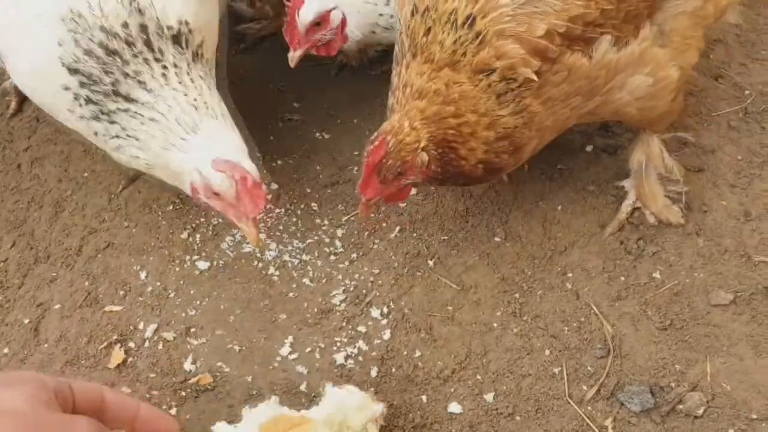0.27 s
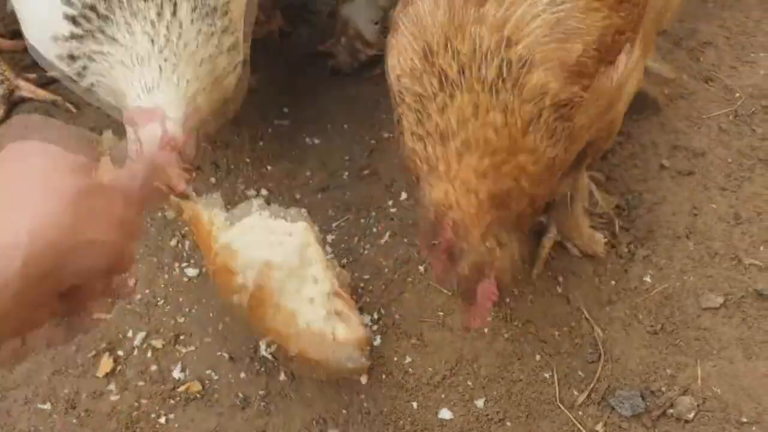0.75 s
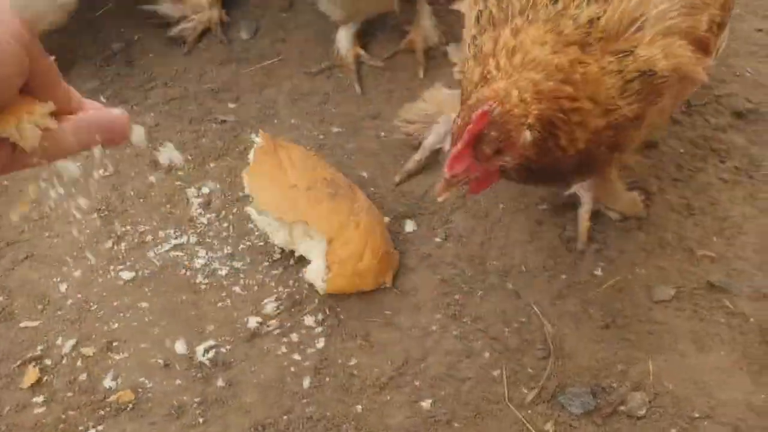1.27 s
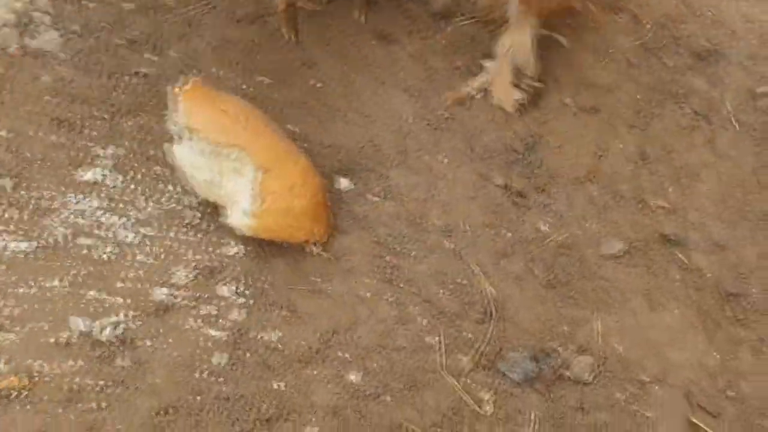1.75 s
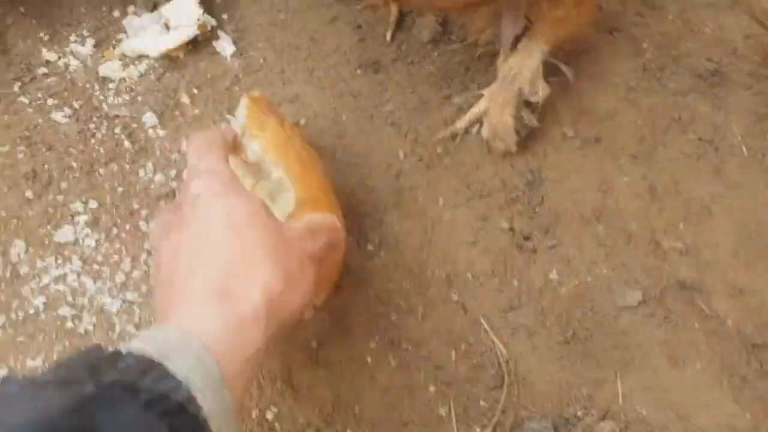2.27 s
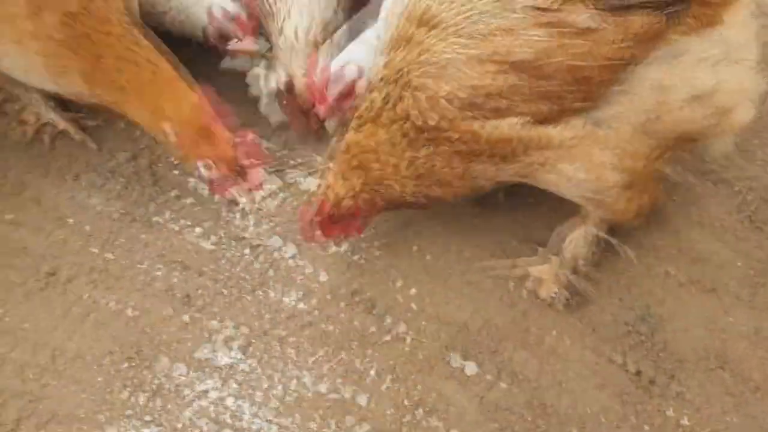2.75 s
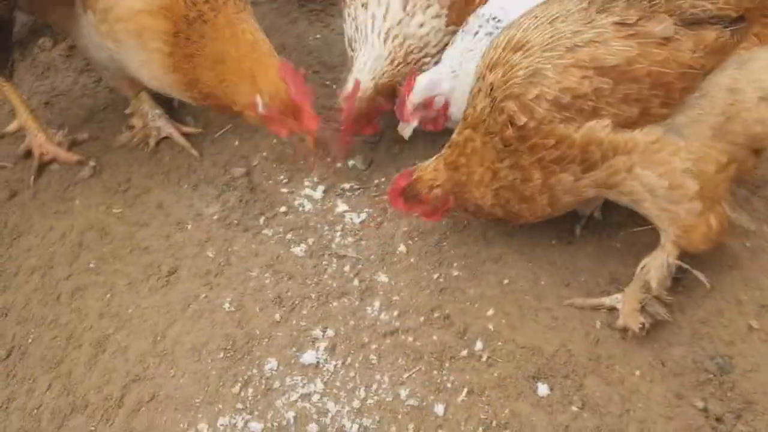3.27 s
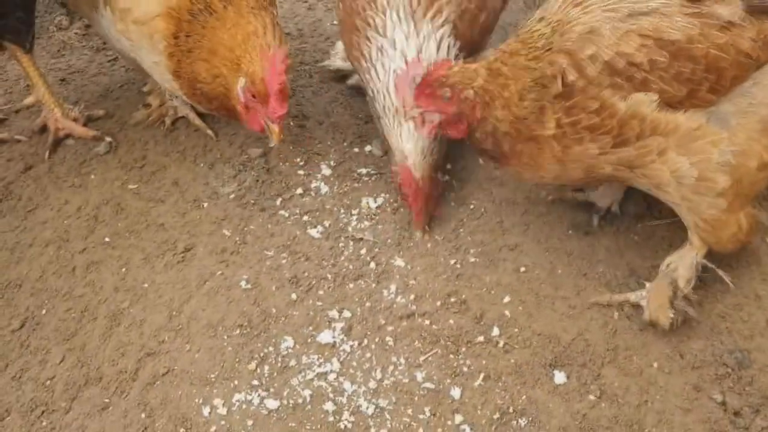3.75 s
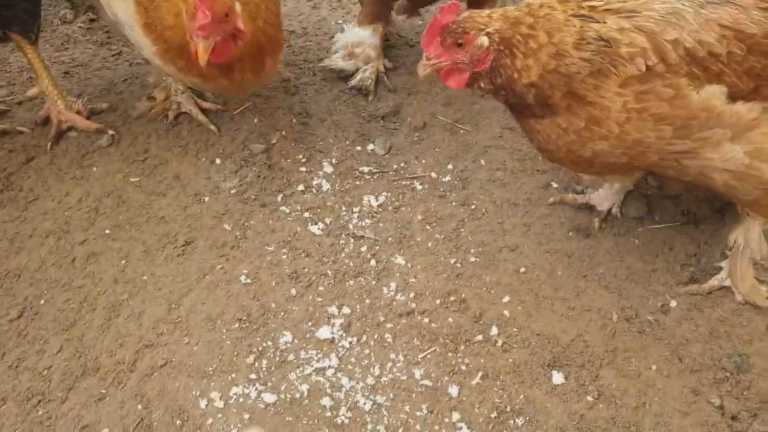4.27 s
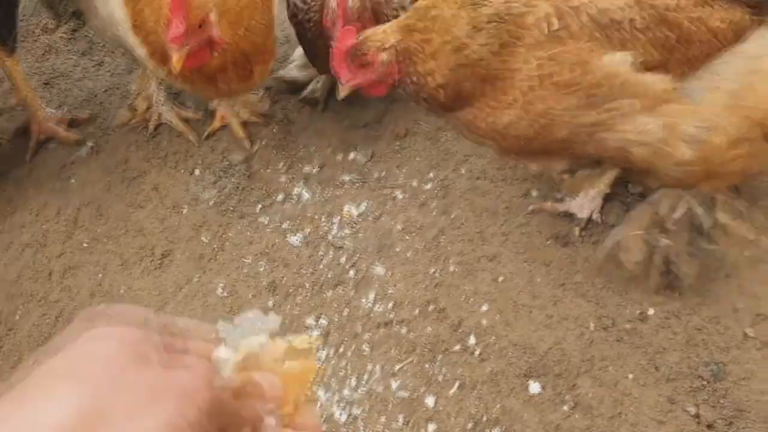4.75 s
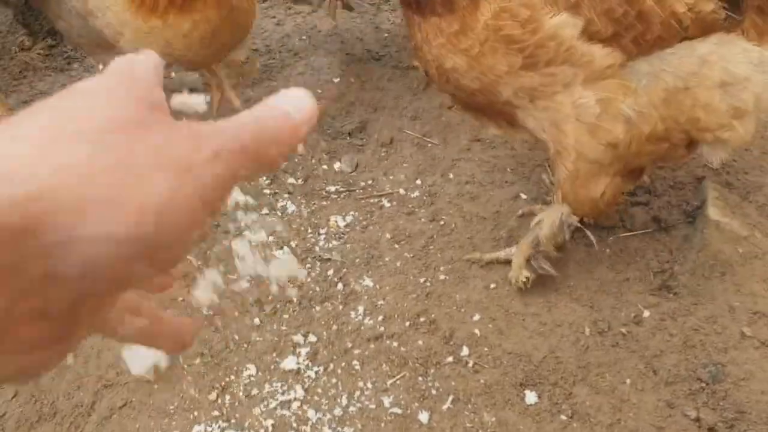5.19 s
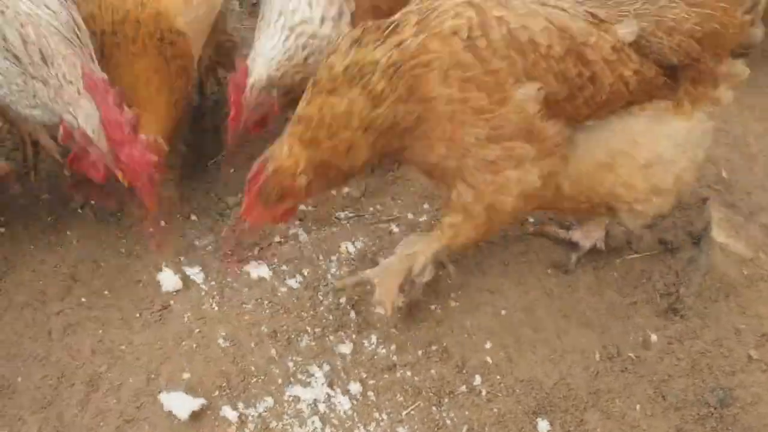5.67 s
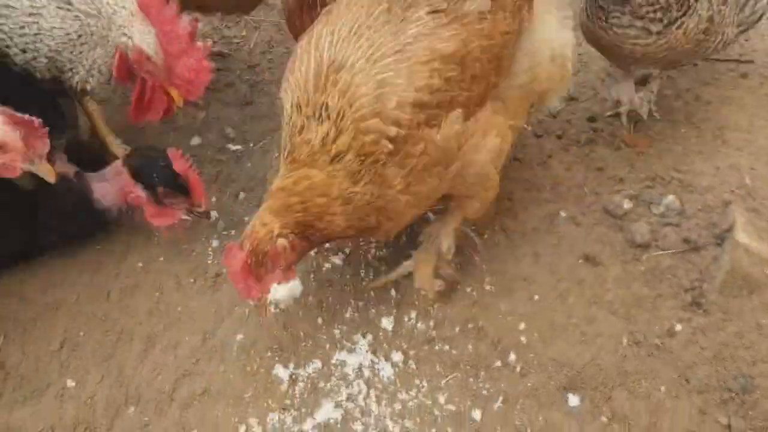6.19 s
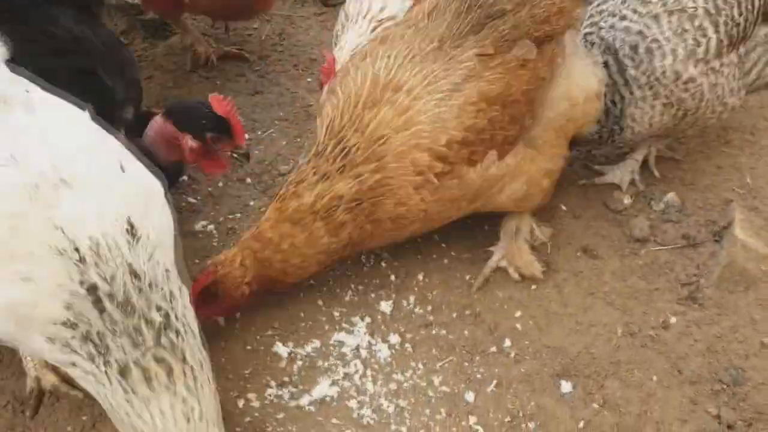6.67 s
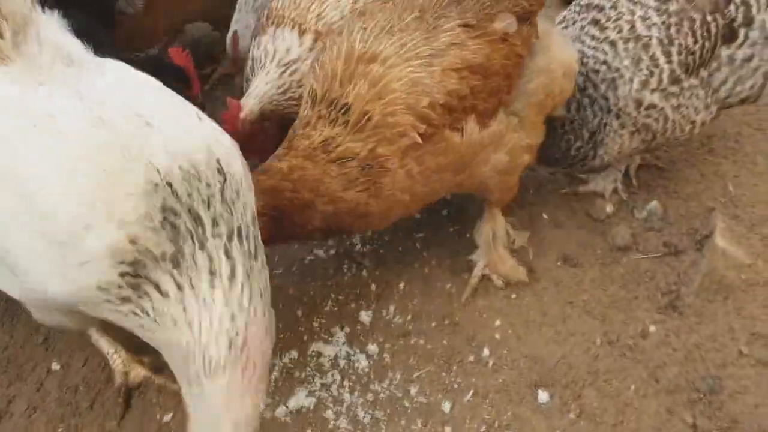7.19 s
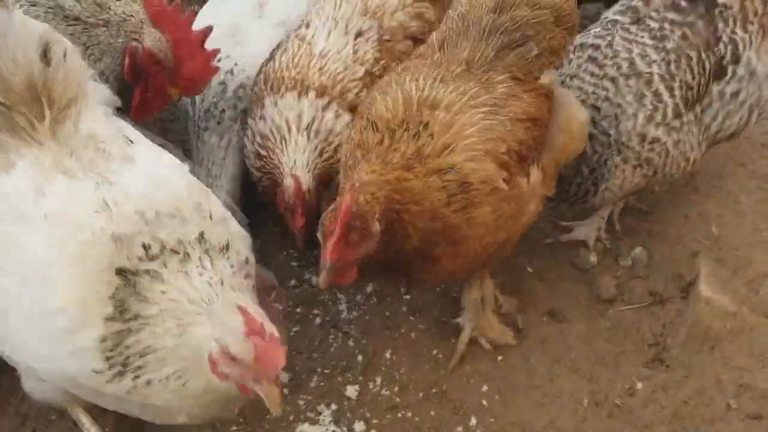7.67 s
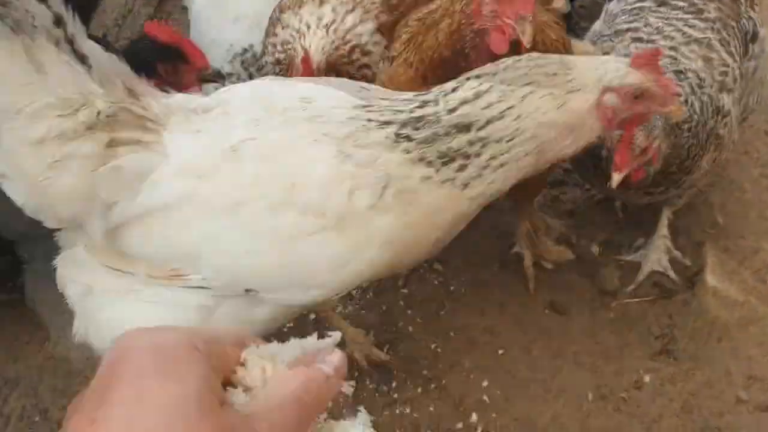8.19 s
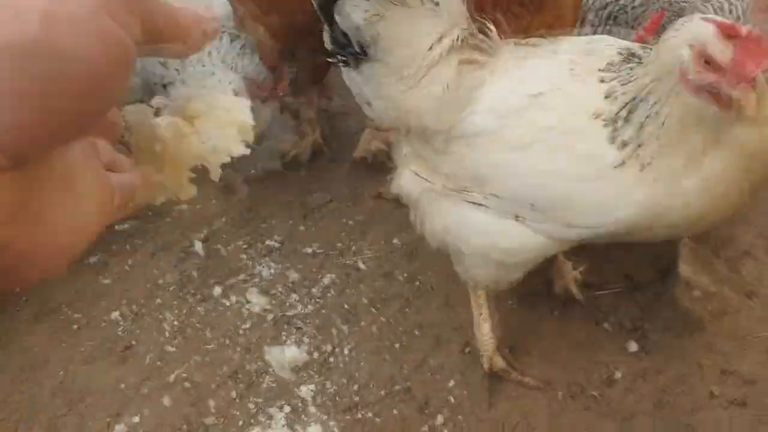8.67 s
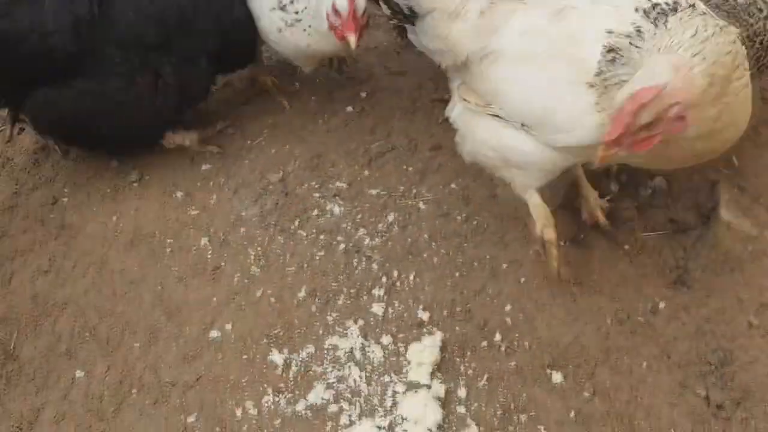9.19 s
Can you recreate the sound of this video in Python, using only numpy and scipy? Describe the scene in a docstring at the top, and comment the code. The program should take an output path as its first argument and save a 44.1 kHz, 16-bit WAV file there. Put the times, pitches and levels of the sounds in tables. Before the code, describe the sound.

Hens feed close by in an outdoor dirt yard with very little echo. For the first 1.5 seconds there are soft clucks, small trills and thin whines, with light beak taps on grit; the sharpest tap lands at 1.6. Louder, higher clucks cluster from 1.9 to 3 seconds. Low, quiet clucks and short trills follow until 4.2, then a brief lull. From 5 to 6.7 seconds comes a busy run of hoarse, fluttering trills and clucks, with one soft low boom at 5.9 and pecks between 6.3 and 6.9. After another lull, a breathy squawk breaks out at 7.8, followed by a peck, trills around 8.2 and 8.6, and last clucks near 9. Throughout, a faint hiss swells and sinks with rustling, crackle, occasional foot scuffs and a low rumble. A distant small bird peeps very faintly at 1.7 and 3.2.

```python
"""In a bare dirt yard, hens feed on bread crumbs close by. They cluck, trill and whine:
the syrinx is the source, and the throat, windpipe and beak filter it. Beaks tick on grit,
feet scuff and one squawk hisses, all as shaped noise. Behind them are a hiss that swells
and sinks with faint rustling and crackle, two faint peeps of a small bird, one soft boom
and a low outdoor rumble. The yard gives a short, weak echo."""
import sys
import numpy as np
from scipy import signal
from scipy.fft import rfft, irfft
from scipy.io import wavfile

SR = 44100
rng = np.random.default_rng(int(sys.argv[2]) if len(sys.argv) > 2 else 0)


def store_wav(level_fs):
    """Save 16-bit WAV to argv[1]."""
    pcm = np.round(np.clip(np.atleast_2d(level_fs), -1, 1) * 32767)
    wavfile.write(sys.argv[1], SR, pcm.T.astype(np.int16))


N = 416304
TIME = np.arange(N) / SR
BAND_LIMIT_HZ = 15950

LEAD_SHARE = .35  # a faint croak leads into a cluck, this share of its attack long
THROAT_OCTAVES_PER_DB, SHUT_DB = 0.285, -8  # the throat resonance sinks with effort, down to SHUT_DB
BEAK_CUT_SHARE = 0.65  # the beak radiates little below this share of the open throat resonance
GAPE_HZ, GAPE_DB_PER_OCTAVE = 1435, 19.5  # throat resonance with the beak wide open; rasp gained
WINDPIPE_HZ, WINDPIPE_WIDTH_HZ, WINDPIPE_DB = 695, 61, -15.5
# Upper throat resonances of a cluck. Each row: frequency in Hz, nominal width in Hz, gain in dB.
RASP_FORMANTS = [(2150,85,10.5),(3500,180,0.5),(4250,280,-2.5),(4740,500,-9),(6250,420,-7.5),(11310,5700,-28)]
# Clucks and, when held long, growls. Each row: start, attack and hold in seconds, peak effort in dB,
# open throat resonance in Hz, pitch in Hz, bend in octaves, roughness from 0 to 1, chest in dB,
# rasp in dB, place.
CLUCK_CALLS = [(0.133,0.022,0.053,-46.5,670,277.5,-0.41,0.37,-1,-45,"middle"),
               (0.752,0.0053,0.042,-45,710,275.3,-0.26,0.06,-4,-35,"middle"),
               (0.888,0.0084,0.014,-37.5,720,292.4,-0.21,0,1.5,-32,"middle"),
               (1.032,0.016,0.028,-43,710,268,-0.095,0.13,-33,-40,"middle"),
               (1.426,0.0025,0.026,-31,945,336.7,-0.082,0.61,-9,-24,"front"),
               (1.857,0.0081,0.054,-38,1120,335.5,0.0017,0.51,-15,-21,"front"),
               (1.888,0.0063,0.013,-22,1280,310,-0.057,0.26,-16,-12,"front"),
               (2.06,0.018,0.0054,-30,1530,339.7,-0.041,0.25,-5,-19,"front"),
               (2.262,0.01,0.018,-18,1470,690,-0.035,0.21,-12,-2,"left"),
               (2.371,0.0031,0.0042,-18,1570,739,0,0.11,-38,-4,"left"),
               (2.379,0.0061,0.026,-23.5,1560,676,-0.15,0.32,-11,-4,"left"),
               (2.578,0.012,0.024,-18.5,1320,324.9,-0.1,0.33,-14.5,-5.5,"middle"),
               (2.767,0.0035,0.027,-27.5,686,359,0.13,0.3,-13,-23,"middle"),
               (2.899,0.01,0.0092,-20,1050,324,-0.1,0.22,-10,-9.5,"middle"),
               (3.321,0.019,0.091,-53,695,238,-0.12,0.32,1,-19,"front"),
               (3.407,0.019,0.075,-38.5,644,203.2,-0.35,0.27,0,-41,"front"),
               (3.509,0.012,0.092,-43.5,600,251,0.24,0.2,0.5,-29,"front"),
               (3.69,0.0066,0.019,-31,1250,742,0.073,0.24,-37,-38,"right"),
               (3.991,0.0048,0.042,-37.5,1050,304.2,-0.091,0.39,-25,-27,"right"),
               (4.181,0.01,0.019,-30,816,281,-0.23,0.3,-14,-30,"right"),
               (4.981,0.0057,0.044,-48.5,910,687,-0.027,0.2,2,-28,"left"),
               (5.051,0.021,0.039,-37.5,1270,600,-0.12,0.5,-15,-7,"left"),
               (5.34,0.0044,0.023,-41.5,1270,695,-0.058,0.42,-16,-16,"left"),
               (5.552,0.011,0.0065,-24,1360,324,-0.21,0.42,-18.5,-0.5,"left"),
               (6.188,0.032,0.004,-37,830,189.6,0.17,0.48,4,-14,"centre"),
               (6.53,0.021,0.019,-32,1040,238.2,0.15,0.38,-25,-17.5,"centre"),
               (8.683,0.0085,0.0089,-39,850,604,-0.019,0.34,-9,-29,"middle"),
               (8.811,0.022,0.0092,-29,1084,651,-0.053,0.22,-43,-29,"right"),
               (9.003,0.028,0.009,-24,1300,627,0.05,0.33,-13,-16,"middle")]
def cluck(attack, hold, peak_db, open_hz, pitch, bend, rough, chest_db, rasp_db):
    """Source and filter: uneven syrinx pulses and puffs of breath excite the throat's resonances."""
    t, effort_db = gesture(attack, hold, LEAD_SHARE * attack)
    size = len(t)
    jitter = np.exp(.02 * wander(size, 25) + .26 * rough * wander(size, 400))
    hz = contour(np.linspace(0, 1, size), pitch, bend) * jitter
    cycles = np.cumsum(hz) / SR
    harmonics = np.arange(1, int(BAND_LIMIT_HZ / pitch))
    shimmer = np.exp(1.16 * rough * wander(size, 480))
    alternation = 1 + 0.8 * rough * np.cos(np.pi * cycles)  # strong and weak pulses take turns
    pulses = np.cos(2 * np.pi * harmonics[:, None] * cycles).sum(0) * shimmer * alternation
    puffs = (.5 + np.exp(-(cycles % 1) / 0.32)) * rng.standard_normal(size)
    drive = (1 - rough) * evened(pulses) + rough * evened(puffs)
    # an open beak raises and widens the throat resonance and lifts the upper ones a little
    throat_hz = open_hz * 2 ** (THROAT_OCTAVES_PER_DB * np.maximum(effort_db, SHUT_DB))
    width = throat_hz.mean()
    lift = (throat_hz / 1250) ** .03 * (1 + .03 * wander(size, 150))
    radiated = signal.lfilter(*signal.butter(1, BEAK_CUT_SHARE * open_hz, "high", fs=SR), drive)
    throat = evened(resonate(formant(radiated, throat_hz, width), throat_hz, 3 * width))
    lowest, *upper = [gain_of(db) * formant(drive, f * lift, 2 * w) for f, w, db in RASP_FORMANTS]
    # the lowest rasp resonance speaks only through a wide-open beak
    gape = gain_of(GAPE_DB_PER_OCTAVE * np.log2(open_hz / GAPE_HZ))
    rasp = evened(gape * lowest + sum(upper))
    # the body radiates the lowest partials; the windpipe rings at one pitch whatever the beak does
    chest = evened(formant(drive, min(1.49 * pitch, 440), width=240))
    windpipe = evened(formant(drive, WINDPIPE_HZ, WINDPIPE_WIDTH_HZ))
    sag_db = 0.19 * effort_db  # chest and rasp fade faster than the rest
    body = evened(throat + gain_of(chest_db + sag_db) * chest + gain_of(WINDPIPE_DB) * windpipe)
    voice = body + gain_of(rasp_db + sag_db) * rasp
    return gain_of(peak_db + effort_db) * evened(voice)


FLUTTER_HZ = 54.41  # mean flutter rate of every trill
BEAK_RING_HZ, BEAK_RING_WIDTH_HZ = 1368, 1100
# Turbulence in a trill. Each row: frequency in Hz, gain in dB.
HOARSE_SPECTRUM = [(100,-38),(250,-12.5),(400,-14.5),(700,-21),(1500,-11),(3000,-48),(9000,-49)]
# Upper throat resonances of a trill. Each row: frequency in Hz, nominal width in Hz, gain in dB.
EDGE_FORMANTS = [(2840,230,-0.5),(3440,400,-2),(4233,300,-12),(6380,300,-4),(7030,260,-6.5)]
# Trills and short scooping whistles. Each row: start, attack and hold in seconds, peak effort in dB,
# mid pitch in Hz, bend and arch in octaves, swing as a share of the pitch, then overtones,
# hoarseness and ringing edge in dB, place.
TRILL_CALLS = [(0.742,0.0035,0.032,-39,595.6,0.014,-0.62,0.041,-31,-23,-38,"middle"),
               (0.865,0.013,0.044,-37,747,-0.068,-0.47,0.039,-45,-28,-46,"middle"),
               (1.02,0.0038,0.019,-44.5,640,-0.56,-0.066,0.02,-37,-32,-44,"middle"),
               (2.341,0.019,0.0083,-24,1534,0.28,-0.042,0.1,-29,-10,-25,"left"),
               (2.872,0.0021,0.024,-40,1440,1,0.6,0.031,-21,2.5,-27,"middle"),
               (3.68,0.0083,0.012,-31,1245,-0.15,0.055,.02,-22,-25,-30,"right"),
               (3.726,0.036,0.1,-37.5,1073,-0.27,0.13,0.11,-17.5,-0.5,-25,"right"),
               (3.953,0.024,0.0071,-28.5,608.5,0.06,-0.014,0.013,-8,-15,-17,"right"),
               (5.048,0.03,0.15,-38,553.5,-0.42,-0.13,0.11,-7.5,-3,-26.5,"left"),
               (5.567,0.0047,0.018,-22,1269,-0.52,-0.14,0.073,-15,-43,-14,"left"),
               (5.61,0.024,0.067,-27.5,1254,0.16,0.14,0.12,-23.5,-11,-31,"left"),
               (5.694,0.006,0.096,-34.5,1160,-0.92,0.15,0.2,-15,-5.5,-28,"left"),
               (5.833,0.012,0.022,-34,854,-0.12,-0.0055,0.37,-16.5,-9,-31,"front"),
               (6.122,0.003,0.023,-32.5,1038,-0.43,0.45,0.048,-13.5,-3,-17,"centre"),
               (6.213,0.036,0.066,-30,1056,-0.063,0.38,0.22,-24,-10.5,-22.5,"centre"),
               (6.546,0.018,0.031,-29,1023,0.14,0.044,0.23,-22,-7,-24,"centre"),
               (6.6,0.026,0.051,-26.5,1033,-0.5,0.25,0.2,-31,-12.5,-31,"centre"),
               (7.813,0.0018,0.022,-31,631,1.3,0.034,0.018,-9,-8.5,-19,"left"),
               (7.837,0.012,0.0099,-21,1120,0.11,0.25,0.017,-16.5,-13,-19,"left"),
               (7.857,0.0043,0.1,-28.5,547.8,-0.25,0.32,0.16,-3,-10,-29,"left"),
               (8.222,0.025,0.031,-32,1017,-0.061,0.59,0.17,-37,-6.5,-35,"middle"),
               (8.571,0.011,0.019,-28,675,0.55,0.2,0.038,-3.5,-10.5,-19.5,"middle"),
               (8.593,0.0094,0.074,-22.5,1189,-0.17,0.028,0.08,-25.5,-28,-42,"middle")]
def trill(attack, hold, peak_db, mid_hz, bend, arch, swing, overtone_db, hoarse_db, edge_db):
    """Modulation: a flutter swings a whistle's pitch and loudness, over a subharmonic rattle."""
    t, effort_db = gesture(attack, hold)
    size = len(t)
    beat = 2 * np.pi * np.cumsum(FLUTTER_HZ * (1 + .08 * wander(size, 50))) / SR
    flutter = np.sin(beat) * (1 + .3 * wander(size, 70))
    hz = contour(t, mid_hz, bend, arch) * (1 + swing * flutter)
    phase = 2 * np.pi * np.cumsum(hz * (1 + 0.035 * wander(size, 380))) / SR
    # the whistle rings out as it swings through the resonance of the open beak
    ring = evened(1 / np.hypot(1, 2 * (hz - BEAK_RING_HZ) / BEAK_RING_WIDTH_HZ))
    overtones = np.sin(2 * phase) + .35 * np.sin(3 * phase)
    tone = evened(np.sin(phase) + gain_of(overtone_db) * overtones)
    # the syrinx slaps shut unevenly on every second cycle; slaps and breath ring the throat
    harmonics = np.arange(1, int(BAND_LIMIT_HZ / mid_hz))
    slaps = np.cos(harmonics[:, None] * phase / 2).sum(0) * np.exp(.5 * wander(size, 300))
    rattle = evened(slaps) + .5 * rng.standard_normal(size)
    hoarse = evened(coloured(rattle, HOARSE_SPECTRUM))
    edge = evened(sum(gain_of(db) * formant(rattle, f, 2 * w) for f, w, db in EDGE_FORMANTS))
    # a wide swing is loudest on its way down, and the edge throbs most
    depth_db = 14 * swing - 0.5
    throb = gain_of(-depth_db * np.cos(beat) + 2.8 * wander(size, 160))
    voice = (ring * tone + gain_of(edge_db) * edge * throb) * throb + gain_of(hoarse_db) * hoarse
    return gain_of(peak_db + effort_db) * evened(voice)


# Soft whines of one hen. Each row: start, attack and hold in seconds, level in dB, pitch in Hz,
# bend in octaves.
WHINE_CALLS = [(0.681,0.023,0.15,-54,559,-0.014), (0.855,0.058,0.039,-48.5,547,0.043),
               (1.061,0.034,0.5,-49,553,0.0019), (1.416,0.011,0.086,-39.5,628,0.16),
               (1.589,0.022,0.013,-45,587,0.091), (3.597,0.0089,0.088,-47.5,551,0.12)]
def whine(attack, hold, db, mid_hz, bend, octave_db=-18):
    """Nearly periodic vibration behind a closed beak: a thin fundamental with a weak octave."""
    t, effort_db = gesture(attack, hold)
    waver = .022 * wander(len(t), 35) + .03 * wander(len(t), 250)
    phase = 2 * np.pi * np.cumsum(contour(t, mid_hz, bend) * (1 + waver)) / SR
    tone = evened(np.sin(phase) + gain_of(octave_db) * np.sin(2 * phase))
    return tone * gain_of(db + effort_db + 3 * wander(len(t), 30))


ONSET_DB, DROOP_DB, RELEASE_DB, FADE_DB = 13, 1.5, 13.5, 13.5  # the rise, then three successive falls
RELEASE_S, FADE_S = .012, .02
def gesture(attack, hold, lead=0):
    """A call's envelope: progress (0 at the start, 1 at release) and effort in dB from the peak."""
    knees = np.cumsum([0, attack, hold, RELEASE_S, FADE_S])
    t = np.arange(-lead, knees[-1], 1 / SR)
    under_db = [ONSET_DB + FADE_DB, ONSET_DB, 0, *np.cumsum([DROOP_DB, RELEASE_DB, FADE_DB])]
    return np.clip(t / knees[2], 0, 1), -np.interp(t, [-lead - 1 / SR, *knees], under_db)


def contour(progress, mid_hz, bend, arch=0):
    """A glide in log frequency: a slope of bend octaves plus a parabola arch octaves high."""
    return mid_hz * 2 ** (bend * (progress - .5) - arch * (2 * progress - 1) ** 2)


# Colour of a beak striking grit. Each row: frequency in Hz, gain in dB.
PECK_SPECTRUM = [(120, -32), (200, 2), (677, 10), (1110, 16.5), (2130, 10), (2510, -8), (5390, 3.5),
                 (10800, -11), (15500, -14)]
# Beak taps. Each row: start in seconds, peak in dB, brightness in dB per octave.
BEAK_TAPS = [(0.378,-52,16),(0.597,-28,1),(1.025,-28,25),(1.634,-17,8.5),(2.696,-31,1),(3.608,-36.5,2),(6.301,-27,5),(6.47,-24,12),(6.871,-30,20),(8.151,-27.5,12.5),(8.966,-36.5,-7)]
def peck(peak_db, tilt_db, decay_s=0.0014):
    """Impact: a beak strikes grit in a brief broadband crunch, brighter on hard grains."""
    age = np.arange(2048) / SR - .004
    burst = rng.standard_normal(len(age)) * (age > 0) * np.exp(-abs(age) / decay_s)
    crunch = coloured(burst, tilted(PECK_SPECTRUM, tilt_db))
    return gain_of(peak_db) * crunch / abs(crunch).max()


# Colour of a short swell of hiss. Each row: frequency in Hz, gain in dB.
SWELL_SPECTRUM = [(200,-13),(800,-16),(3500,4.5),(7000,5),(9000,-7.5),(15500,1)]
# Short swells of hiss: foot scuffs, and the breathy hiss of a hen's squawk at 7.82 s.
# Each row: start and length in seconds, level in dB, brightness in dB per octave.
HISS_SWELLS = [(0,0.2,-55,-2), (0.371,0.028,-44.5,6.5), (0.594,0.055,-44.5,-3), (.628,0.21,-50.5,-1),
               (1.02,0.05,-45,14), (1.41,0.097,-51,1.5), (2.65,0.26,-54,-6.5), (3.95,0.096,-49.5,0.5),
               (4.623,.11,-50,2.5), (6.292,0.044,-51.5,0), (6.45,0.071,-46.5,4), (7.5,0.21,-55,1.5),
               (7.82,0.11,-44,-1), (9.198,0.2,-56.5,0.5)]
def hiss_swell(length, db, tilt_db):
    """Enveloped noise: a grainy hiss rises and falls under half a sine wave."""
    size = int(length * SR)
    grains = rng.standard_normal(size) * gain_of(3.5 * wander(size, 300))
    hiss = coloured(grains, tilted(SWELL_SPECTRUM, tilt_db))
    return gain_of(db) * evened(hiss * np.sin(np.linspace(0, np.pi, size)))


# Colour of the background hiss. Each row: frequency in Hz, gain in dB.
HISS_SPECTRUM = [(190, -24), (330, 1.5), (370, -5), (741, -5), (844, -9), (1020, -4), (2580, -12),
                 (4400, -7), (7260, -6), (8680, -13), (11400, -7.5), (15800, -4.5)]
# Rise and fall of the background hiss. Each row: time in seconds, relative level in dB.
HISS_LEVELS = [(0.0, -58.5), (0.33, -68.5), (0.81, -64.5), (1.3, -65.5), (1.7,-62.5), (1.84,-68),
               (2.0, -62.5), (2.28, -59), (2.65, -56.5), (2.8, -56), (3.02, -63), (3.32, -72), (3.94, -62),
               (4.3, -72), (4.86, -70), (5.52, -62), (5.75, -56), (6.03, -65.5), (6.49, -58.5),
               (7.19, -73.5), (7.4, -70.5), (7.55, -64), (7.74, -69.5), (8.55,-63.5), (8.75,-66),
               (9.12, -61.5), (9.44, -69.5)]
def background_hiss(boost_db=7, crackle_db=-9, grains_per_s=90, grain_decay_s=0.0019, left_db=3):
    """Modulated noise: a hiss swells and sinks, with faint rustling and gritty crackle."""
    sizes = gain_of(6 * np.minimum(rng.exponential(1, N), 3.5))
    impulses = sizes * (rng.random(N) < grains_per_s / SR)
    bursts = signal.lfilter([1], [1, -np.exp(-1 / (grain_decay_s * SR))], impulses)
    crackle = evened(stereo_noise(HISS_SPECTRUM) * bursts)
    hiss = stereo_noise(HISS_SPECTRUM) * gain_of(2 * wander(N, 18))
    level = gain_of(np.interp(TIME, *np.transpose(HISS_LEVELS)) + boost_db)
    return level * (hiss + gain_of(crackle_db) * crackle) * gain_of([[left_db / 2], [-left_db / 2]])


# A small bird further off. Each row: start in seconds, level in dB.
BIRD_PEEPS = [(1.71, -67.5), (3.181, -68)]
def peep(db, start_hz=4400, end_hz=3750, length=0.09):
    """A frequency sweep: one thin, slightly unsteady whistle falls in pitch."""
    size = int(length * SR)
    hz = np.linspace(start_hz, end_hz, size) * (1 + 0.035 * wander(size, 500))
    return gain_of(db) * evened(np.sin(2 * np.pi * np.cumsum(hz) / SR) * np.hanning(size))


def boom(start_hz=112, end_hz=88, glide_s=0.058, attack_s=0.00063, decay_s=0.12, db=-35):
    """A damped oscillation: a soft low boom sinks in pitch as it dies."""
    t = np.arange(SR // 2) / SR
    hz = end_hz + (start_hz - end_hz) * np.exp(-t / glide_s)
    envelope = np.exp(-t / decay_s) * (1 - np.exp(-t / attack_s))
    return gain_of(db) * np.sin(2 * np.pi * np.cumsum(hz) / SR) * envelope


# Colour of the outdoor rumble. Each row: frequency in Hz, gain in dB.
RUMBLE_SPECTRUM = [(20, -24), (46, -6.5), (70, -3), (98, -6), (125, -12), (160, -18.5), (400, -28),
                   (700, -69.5)]
def rumble(db=-56.5):
    """Amplitude-modulated bass noise: the rumble swells and sinks with the background hiss."""
    hiss_db = np.interp(TIME, *np.transpose(HISS_LEVELS))
    swell = gain_of(.35 * (hiss_db - hiss_db.mean()) + wander(N, 4))
    return gain_of(db) * swell * stereo_noise(RUMBLE_SPECTRUM) * gain_of([[.5], [-.5]])


# Likeness of the two channels. Each row: frequency in Hz, correlation from 0 to 1.
COHERENCE = [(60,0.87),(300,1),(700,0.12),(1400,0.29),(15000,0.19)]
def stereo_noise(spectrum):
    """Partial coherence: coloured noise that is alike in both ears only in the bass."""
    left, independent = rfft(rng.standard_normal((2, N)))
    same = read(COHERENCE, np.fft.rfftfreq(N, 1 / SR))
    right = same * left + np.sqrt(1 - same ** 2) * independent
    return evened(coloured(irfft([left, right], N), spectrum))


# Decay of the yard's echo. Each row: frequency in Hz, time to fall 60 dB in seconds.
YARD_DECAY = [(200,.13),(1000,.12),(4000,.09),(12000,.06)]
def yard_echo(x):
    """Reflection: sparse echoes from the ground and fences, each band dying at its own speed."""
    taps = rng.standard_normal((2, SR // 2)) * (rng.random((2, SR // 2)) < .06)
    taps[:, :100] = 0  # the gap before the first reflection
    hz, t, bands = signal.stft(taps, SR, nperseg=256)
    decay = gain_of(-60 * t / read(YARD_DECAY, hz)[:, None])
    tail = signal.istft(bands * decay, SR, nperseg=256)[1]
    return signal.fftconvolve(x, tail / np.linalg.norm(tail[0]), axes=1)[:, :N]


# Directions by name. Each row: left level over right in dB, delay of the right ear in milliseconds.
DIRECTIONS = {"left": (3.5, .27), "front": (1, .24), "middle": (1.3, .1), "centre": (-1.4, .1),
              "right": (1.2, -.24)}
def add(mix, s, sound, place):
    """Level and time differences between the ears place a sound, which enters at s seconds."""
    pan_db, late_ms = DIRECTIONS[place]
    at = np.arange(len(sound))
    sound = sound * np.clip(np.minimum(at, at[::-1]) / 100, 0, 1)  # soft ends
    for channel, start, db in zip(mix, (s, s + late_ms / 1000), (pan_db / 2, -pan_db / 2)):
        part = channel[round(start * SR):][:len(sound)]
        part += gain_of(db) * sound[:len(part)]


def resonate(x, hz, width):
    """A resonance of gain 1 that follows the curve hz, with its bandwidth in Hz."""
    turn = np.exp(2j * np.pi * np.cumsum(hz * np.ones(len(x))) / SR)
    pole = np.exp(-np.pi * width / SR)
    return 2 * (turn * signal.lfilter([1 - pole], [1, -pole], x / turn + 1e-18)).real


def formant(x, hz, width):
    """Two equal resonances in cascade give a peak with steeper skirts."""
    return resonate(resonate(x, hz, width), hz, width)


def wander(size, hz):
    """Low-pass noise: a random drift of rms about 1, mostly slower than hz."""
    f = np.fft.rfftfreq(size + SR, 1 / SR)
    return evened(irfft(rfft(rng.standard_normal(size + SR)) / (1 + (f / hz) ** 4)))[:size]


def coloured(x, points):
    """Filtering: multiplies the spectrum by a curve of (Hz, dB) points."""
    size = x.shape[-1]
    return irfft(rfft(x) * gain_of(read(points, np.fft.rfftfreq(size, 1 / SR))), size)


def tilted(points, db_per_octave):
    """Spectral tilt: adds a slope to a curve of (Hz, dB) points."""
    return [(hz, db + db_per_octave * np.log2(hz)) for hz, db in points]


def read(points, hz):
    """Interpolation on a log-frequency axis."""
    f, value = np.transpose(points)
    return np.interp(np.log(hz + 1), np.log(f + 1), value)


def gain_of(db):
    """Decibels to amplitude."""
    return 10 ** (np.asarray(db) / 20)


def evened(x):
    """Normalisation to rms 1."""
    return x / np.sqrt(np.mean(x ** 2) + 1e-20)


def scene():
    """Superposition: the direct sounds, their echo, the background hiss and the rumble add."""
    direct = np.zeros((2, N))
    for s, attack, *call, place in CLUCK_CALLS:
        add(direct, s - LEAD_SHARE * attack, cluck(attack, *call), place)
    for s, *call, place in TRILL_CALLS:
        add(direct, s, trill(*call), place)
    for s, *call in WHINE_CALLS:
        add(direct, s, whine(*call), "front")
    for s, *tap in BEAK_TAPS:
        add(direct, s, peck(*tap), "left")
    for s, *swell in HISS_SWELLS:
        add(direct, s, hiss_swell(*swell), "middle")
    for s, db in BIRD_PEEPS:
        add(direct, s, peep(db), "left")
    add(direct, 5.893, boom(), "middle")
    bass = rumble()
    return direct + gain_of(-12) * yard_echo(direct) + background_hiss() + bass


# Response of the right microphone port. Each row: frequency in Hz, gain against the left in dB.
RIGHT_PORT_RESPONSE = [(100,-3.5),(4500,-3),(7000,-3),(8800,-21.5),(11000,-10),(15000,-12)]
def record(dry):
    """Frequency response: the right microphone port is duller, and both channels are band-limited."""
    ports = np.array([dry[0], coloured(dry[1], RIGHT_PORT_RESPONSE)])
    low_pass = signal.firwin(511, BAND_LIMIT_HZ, window=("kaiser", 9), fs=SR)
    return signal.oaconvolve(ports, low_pass[None], "same")


dry = scene()
out = record(dry)
store_wav(out)
```